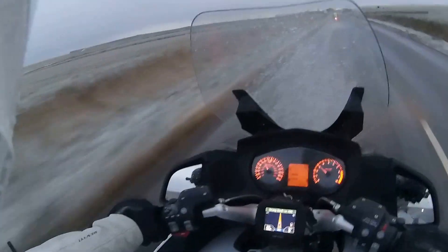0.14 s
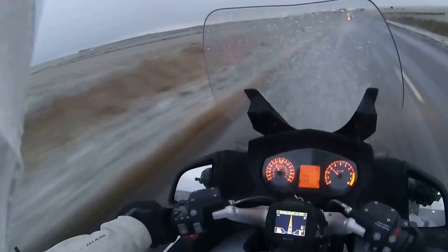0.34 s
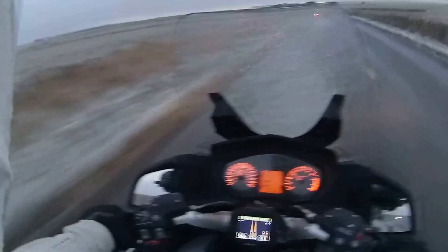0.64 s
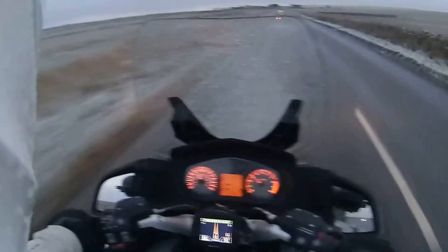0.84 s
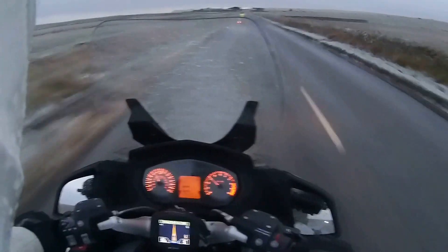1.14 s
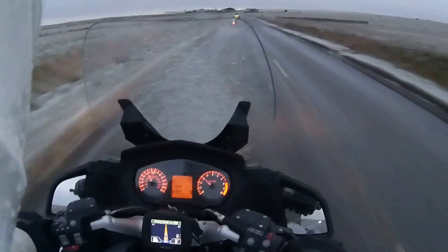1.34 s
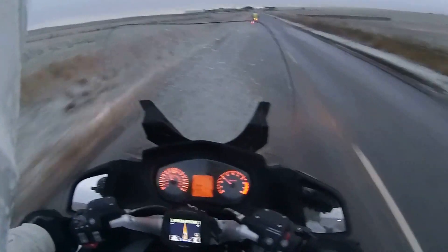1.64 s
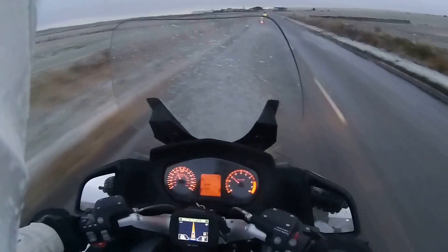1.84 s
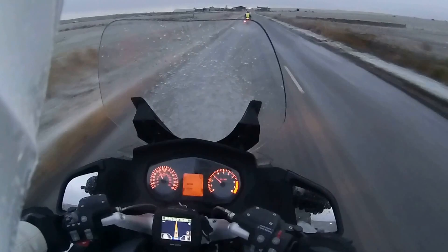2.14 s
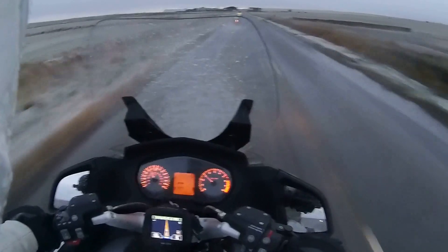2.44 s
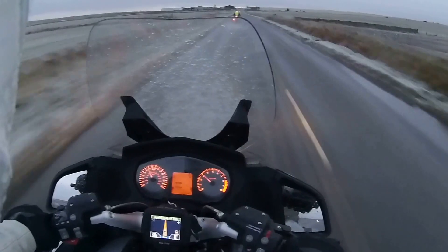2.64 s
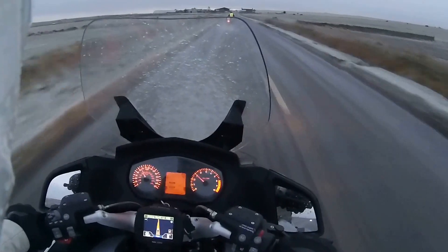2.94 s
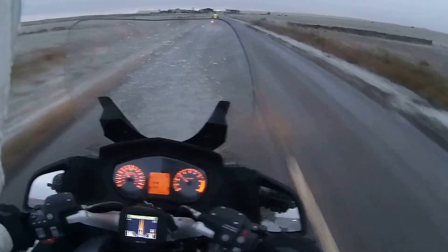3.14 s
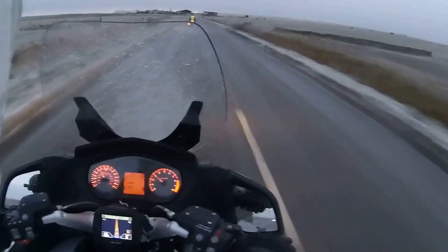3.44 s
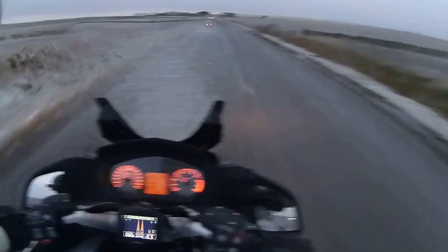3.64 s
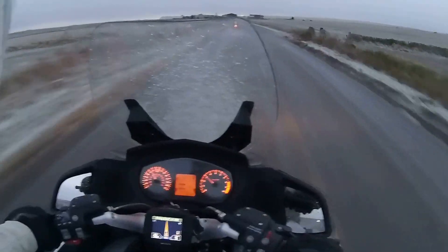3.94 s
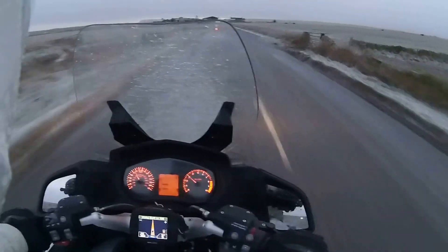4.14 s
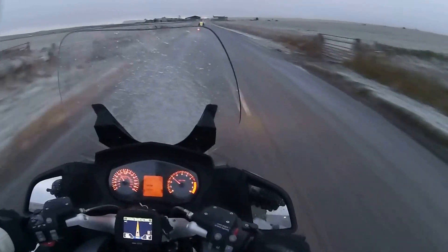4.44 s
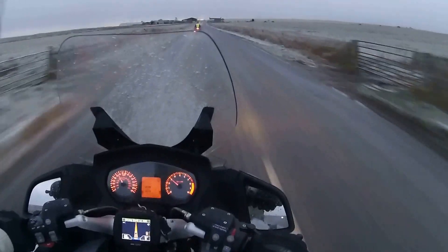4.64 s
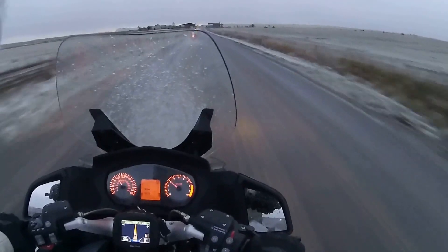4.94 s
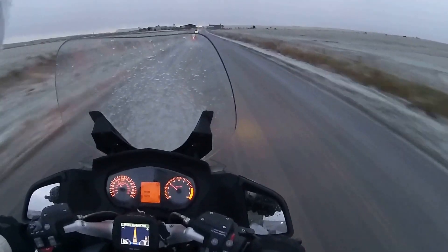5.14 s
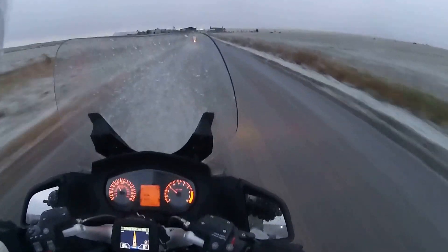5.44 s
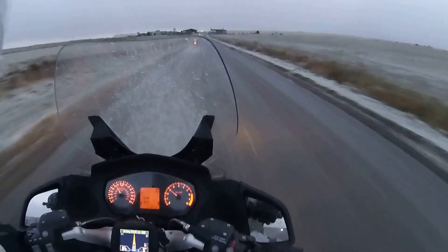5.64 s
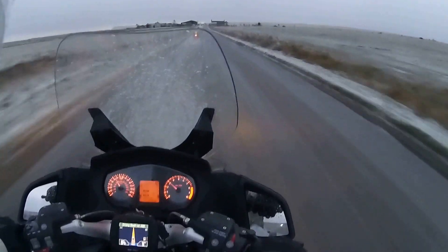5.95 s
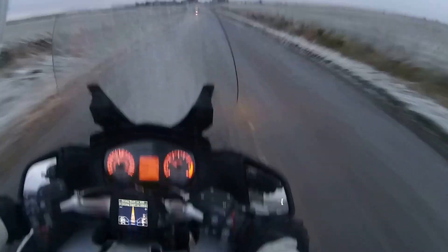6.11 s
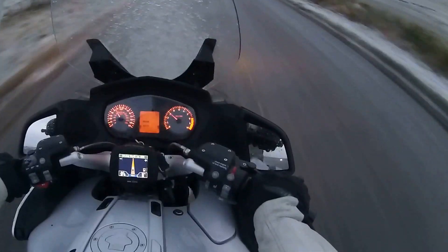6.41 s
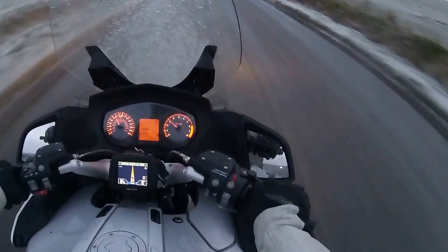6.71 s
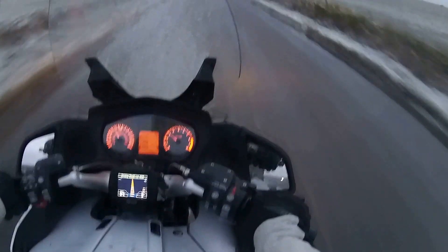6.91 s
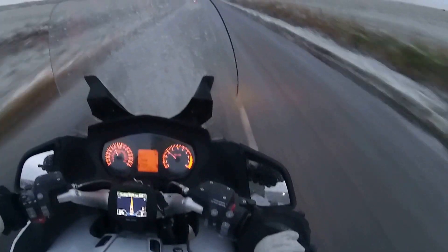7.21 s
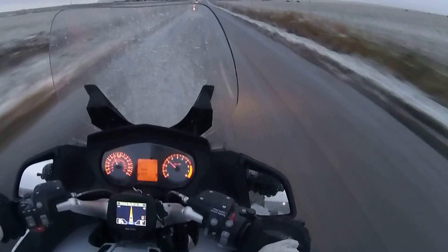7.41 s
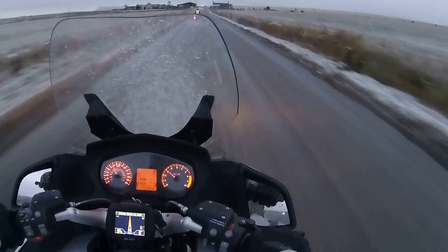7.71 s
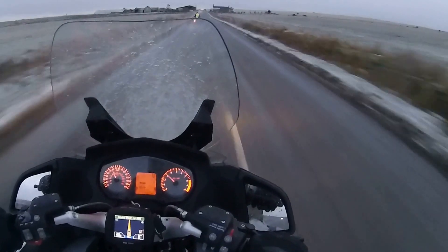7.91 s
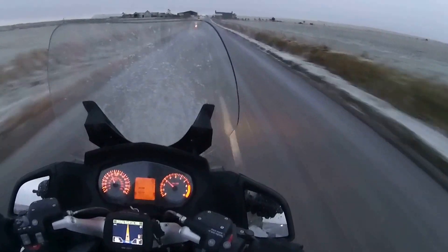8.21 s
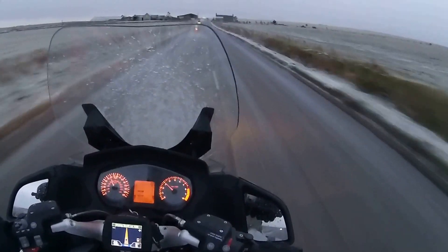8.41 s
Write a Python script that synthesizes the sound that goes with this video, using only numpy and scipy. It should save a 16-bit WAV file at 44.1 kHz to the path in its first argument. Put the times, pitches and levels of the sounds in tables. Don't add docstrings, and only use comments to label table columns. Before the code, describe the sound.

Close, boxed-in wind noise from a helmet-mounted microphone on a speeding motorcycle: rapid irregular buffeting, bassy slaps and brief gusty puffs, with automatic level dips after surges and gradual recovery. Air hisses faintly around the edges, fine spray and droplets tick on the casing, and the steady engine drone is nearly buried. A faint high-pitched circuit buzz runs at first, cuts out, then resumes until the end. Nearly mono, outdoors, without echo.

```python
import sys
import numpy as np
from scipy import signal
from scipy.fft import rfft, irfft, next_fast_len
from scipy.io import wavfile
from scipy.ndimage import uniform_filter1d

SR = 44100
rng = np.random.default_rng(int(sys.argv[2]) if len(sys.argv) > 2 else 0)


def unload_audio(sound):
    columns = np.transpose(np.atleast_2d(sound))
    steps = np.round(np.clip(columns, -1, 1) * 32767)
    wavfile.write(sys.argv[1], SR, steps.astype(np.int16))


def natural_amplitude(level_db):
    exponent = np.asarray(level_db, float) / 20
    return 10 ** exponent


N = 377937
CUTOFF_HZ = 15330

# centre_s, signed_height (relative; negative = suction)
SLAPS = [(0.36, 0.5), (0.517, -0.7), (0.767, 0.69), (0.842, 0.45), (1.394, 0.77), (1.458, 0.52),
         (1.623, -0.54), (1.654, -0.67), (1.902, 0.6), (2.367, 0.47), (2.772, 0.79), (2.822, 0.55),
         (3.038, -0.51), (3.417, 0.56), (3.441, 0.31), (3.572, -0.58), (5.506, 0.24), (5.572, 0.52),
         (5.666, 0.64), (5.837, 0.52), (6.14, -0.47), (6.337, -0.55), (6.502, -0.55), (6.761, 0.62),
         (6.996, -0.39), (7.023, -0.58), (7.048, -0.54), (7.086, 0.62), (7.255, -0.41), (7.378, -0.46)]
# centre_s, rise_db (negative = brief slackening)
PUFFS = [(0.095, 3), (0.513, 2.5), (0.758, 7), (1.16, 1.5), (1.365, 5.5), (1.467, 2.5), (1.634, 6),
         (1.838, 4.5), (1.905, 5), (2.267, 5.5), (2.353, 1.5), (2.7, -1), (2.781, 3.5), (2.948, 1),
         (3.087, 3.5), (3.558, 5), (3.914, 4.5), (4.082, 3), (4.152, 3.5), (4.458, 5.5), (4.887, 6),
         (5.001, 3.5), (5.49, 2), (5.88, 6.5), (6.143, 5), (6.475, 0.5), (6.752, 2.5), (7.328, 3),
         (7.854, 2.5), (8.499, 3.5)]
# step_s,
# level_after_db
DUCKS = [(0.0, -2.3), (0.504, -1), (0.562, -3.5), (0.913, -0.5), (1.079, -2.5), (1.512, -1.5),
         (1.706, -2.5), (2.01, -3.5), (2.31, -2.1), (2.415, -2.5), (2.863, -0.5), (3.102, -2.5),
         (3.357, 2.5), (3.477, 0.5), (3.588, 0), (3.861, 0.1), (4.11, -0.46), (4.471, -1.5), (4.639, -2),
         (4.784, -3), (5.193, -1.65), (5.703, -3), (5.887, -2.1), (6.47, 1.3), (6.735, 0.15), (7.075, -0.2),
         (7.408, -1.4), (7.759, -2), (8.013, -5), (8.357, -3)]


def wind():
    # frequency_hz, density_db (per Hz)
    buffet_colour = [(12, -41), (20, -9), (43, -3.5), (131, 0), (270, -7), (329, -5.5), (632, -22.5),
                     (745, -25), (822, -28.5), (1000, -32.5), (1300, -60), (2200, -120)]
    # frequency_hz, density_db (per Hz)
    rush_colour = [(900, -1), (1130, 0.5), (1320, -2), (1610, 0), (2440, -6.5), (3200, -5.5), (4100, -12),
                   (5080, -13), (6360, -19), (8100, -23), (8900, -21), (10500, -23.5), (12500, -30),
                   (15300, -37)]
    buffet_db, rush_db = -21, -39
    eddies, flutter = drift(10.7), drift(74.0)
    puffs_db = bumps(PUFFS, width_s=0.019)

    def buffet_eddies(hz):
        return (hz / 500) ** 0.38 * (1.3 * eddies + 1.33 * flutter + 0.47 * puffs_db)

    def rush_eddies(hz):
        return (hz / 4000) ** 0.14 * (0.39 * eddies + 1.18 * flutter + 0.87 * puffs_db)

    low = turbulence(buffet_colour, (170, 600), 15, 950, buffet_eddies, own_db=0.11, own_rate=10.6)
    high = turbulence(rush_colour, (900, 2300), 950, CUTOFF_HZ, rush_eddies, own_db=0.16, own_rate=42.0)
    return slapped(natural_amplitude(buffet_db) * low, hz=191) + natural_amplitude(rush_db) * high


def turbulence(spectrum, ref_hz, low_hz, high_hz, shared, own_db, own_rate):
    # time_s, level_db (about its mean)
    gusts = [(0.0, 2.5), (.35, 3), (.7, -.5), (1.2, 0.5), (1.85, 0.5), (2.2, 1.5), (2.8, 0.5), (3.2, -1),
             (3.7, -1), (4.2, -0.5), (4.65, -0.5), (5.3, -0.5), (5.9, 0.5), (6.5, -0.5), (7.0, 0), (7.4, 1),
             (8.0, 0), (8.57, 2.5)]
    # frequency_hz, share (of the gust swing)
    gust_share = [(90, 0.85), (320, 1.26), (1500, 0.94), (4800, 1.5)]
    # frequency_hz, spread_db
    lump_spread = [(90, 1.5), (320, 1.5), (1500, .8), (4800, 1.5), (10000, 1.1)]
    # centre_s, change_db, half_length_s
    roar_swells = [(0.6, 3.5, 0.036), (0.85, 6, 0.043), (1.22, -4.0, 0.04), (1.72, 1.5, 0.03),
                   (1.94, 2.5, 0.07), (2.36, -0.5, 0.07), (2.92, 3.5, 0.053), (3.19, 3.5, 0.033),
                   (3.35, -3.2, 0.05), (4.26, 3, 0.037), (4.33, 0, 0.034), (4.51, -1, 0.03), (4.95, -2, 0.035),
                   (5.23, -2.5, 0.07), (6.23, -4.5, 0.04), (6.44, -1, 0.11), (6.68, 0, 0.04), (6.94, 4, 0.04),
                   (7.05, -3, 0.04), (7.35, -5.0, 0.04), (7.51, -7, 0.036), (8.03, 4.5, 0.028),
                   (8.14, -3, 0.04), (8.27, 3, 0.04)]
    # centre_s, change_db, half_length_s
    stream_swells = [(0.1, -1.8, 0.051), (0.27, -1.5, 0.04), (1.22, -2, 0.04), (1.71, 2, 0.04),
                     (1.96, 1, 0.04), (2.12, 1, 0.03), (2.54, -2.5, 0.046), (3.13, -2, 0.042),
                     (3.56, 0, 0.038), (4.29, 1.1, 0.13), (4.65, 3.5, 0.095), (4.95, -2.5, 0.04),
                     (5.09, 2, 0.045), (5.69, 1, 0.05), (5.87, 0.2, 0.045), (6.18, -2.0, 0.032),
                     (6.41, -1.9, 0.052), (6.51, 2, 0.045), (7.03, -0.8, 0.04), (7.55, 1, 0.04),
                     (7.82, -2, 0.044), (8.12, -2.5, 0.04), (8.31, 2, 0.11), (8.45, -4, 0.033)]
    roll_top_hz, swell_low_hz = 350, 350
    gust_db = np.interp(np.arange(N) / SR, *np.transpose(gusts))
    roll_db, swell_db = bells(roar_swells), bells(stream_swells)
    out = np.zeros(N)
    for centre, band in octaves(spectrum, ref_hz, low_hz, high_hz):
        lumps_db = at_hz(lump_spread, centre) * drift(4.6)
        rolling_db = roll_db / (1 + (centre / roll_top_hz) ** 2)
        swelling_db = swell_db * (centre / 1500) ** 0.1 / (1 + (swell_low_hz / centre) ** 2)
        follow_db = at_hz(gust_share, centre) * gust_db
        flicker_db = own_db * drift(own_rate)
        level_db = follow_db + rolling_db + swelling_db + shared(centre) + lumps_db + flicker_db
        out += natural_amplitude(level_db) * band
    return out


def slapped(buffeting, hz):
    hold = np.clip(0.75 * bumps([(s, 1) for s, height in SLAPS], 0.42 / hz), 0, 1)
    pulse = 1.81 * bumps(SLAPS, 0.18 / hz) - 0.5 * bumps(SLAPS, 0.71 / hz)
    return buffeting * (1 - hold) + 0.83 * pulse


def octaves(spectrum, ref_hz, low_hz, high_hz):
    size = next_fast_len(N)
    hz = np.arange(1, size // 2 + 2) * SR / size
    colour = natural_amplitude(at_hz(spectrum, hz)) * (hz > low_hz) * (hz <= high_hz)
    inside = (hz > ref_hz[0]) & (hz < ref_hz[1])
    colour = colour / np.sqrt(2 / size * np.sum(colour[inside] ** 2))
    noise = colour * rfft(rng.standard_normal(size))
    for centre in 20 * 2. ** np.arange(11):
        if low_hz / 2 < centre < high_hz * 2:
            share = np.clip(1 - abs(np.log2(hz / centre)), 0, 1)
            yield centre, irfft(share * noise, size)[:N]


def drift(rate):
    r = np.exp(-40 * np.pi * rate / SR)
    slow = signal.lfilter([1], [1, -2 * r, r * r], rng.standard_normal(N // 20 + 2002))
    slow = slow[2000:]
    return np.interp(np.arange(N) / 20, np.arange(len(slow)), rms_one(slow))


def bumps(events, width_s):
    bell = np.exp(-(np.arange(-2000, 2001) / SR / width_s) ** 2)
    out = np.zeros(N + 4001)
    for s, value in events:
        at = round(s * SR)
        out[at:at + 4001] += value * bell
    return out[2000:2000 + N]


def bells(rows):
    t = np.arange(0, N + 64, 64) / SR
    change_db = sum(db * np.exp(-((t - s) / half_s) ** 2) for s, db, half_s in rows)
    return np.interp(np.arange(N) / SR, t, change_db)


def rms_one(x):
    return x / np.sqrt(np.mean(x ** 2) + 1e-20)


def at_hz(points, hz):
    point_hz, value = np.transpose(points)
    return np.interp(np.log(hz), np.log(point_hz), value)


def spray():
    # start_s, length_s, level_db
    spray_puffs = [
        (.08, .07, -53),
        (.3, .15, -62),
        (5.218, .06, -54),
        (5.35, 0.064, -57),
        (5.477, 0.074, -46),
        (5.63, 0.065, -68),
        (7.127, 0.15, -49.5),
        (7.29, .08, -50),
        (7.45, 0.08, -52),
        (7.57, .04, -60),
    ]
    # frequency_hz, density_db (per Hz)
    spray_colour = [(6000, -30), (8000, -16), (9000, -1), (10300, 1), (11200, -6), (13200, -8),
                    (15300, -13)]
    swell = np.zeros(N)
    for start, length, level_db in spray_puffs:
        at, span = round(start * SR), round(length * SR)
        swell[at:at + span] += natural_amplitude(level_db) * np.sin(np.linspace(0, np.pi, span)).clip(0) ** 0.52
    ticks_per_s = 14
    mist = (rng.random(N) < ticks_per_s / SR) * natural_amplitude(-65 + 2.8 * rng.exponential(1, N).clip(0, 3))
    mist = signal.lfilter([1], [1, -0.985], mist)
    hiss = sum(band for hz, band in octaves(spray_colour, (8900, 11800), 6000, CUTOFF_HZ))
    return (swell * natural_amplitude(1.7 * drift(120.)) + mist) * hiss


def engine():
    firing_hz, level_db = 98.2, -44
    phase = 2 * np.pi * np.cumsum(firing_hz * (1 + 0.005 * drift(0.48))) / SR
    return natural_amplitude(level_db) * np.sqrt(2) * np.sin(phase)


def droplets():
    # start_s, peak_db, ring_hz
    drops = [(.05, -37, 11800), (.457, -52, 13900), (.822, -50, 13000), (1.072, -48, 14000),
             (1.95, -48, 12000), (3.55, -48, 11000), (4.645, -48, 14000), (6.989, -42, 9300),
             (7.01, -48, 13500), (7.05, -50, 11500), (7.335, -39, 12500), (7.405, -48, 9500),
             (7.598, -46, 13500), (7.636, -39, 10000), (7.877, -46, 9000), (8.352, -48, 13500),
             (8.41, -34, 8500), (8.553, -36, 9000)]
    age = np.arange(int(0.012 * SR)) / SR
    out = np.zeros(N + len(age))
    noises = rng.standard_normal((len(drops), len(age)))
    for (s, peak_db, hz), noise in zip(drops, noises):
        at = round(s * SR)
        edges = [hz / 1.2, min(hz * 1.1, CUTOFF_HZ)]
        ring = signal.butter(1, edges, "band", fs=SR, output="sos")
        burst = rms_one(signal.sosfilt(ring, noise))
        out[at:at + len(age)] += natural_amplitude(peak_db) * burst * np.exp(-age / 0.002)
    return out[:N]


def buzz():
    # multiple, level_db (rms)
    harmonics = [(1, -52), (2, -70), (3, -53), (4, -50), (5, -54.5), (7, -57), (8, -56), (8.5, -75),
                 (9, -61.5), (9.5, -79), (11, -70), (12, -76), (15, -69), (16, -64), (17, -66), (17.5, -85),
                 (18.5, -84), (19, -66.5)]
    # start_s, end_s
    on_times = [
        (0, 1.35),
        (4.397, 9),
    ]
    switching_hz = 800
    t = np.arange(N) / SR
    on = sum((t >= start) * (t < end) for start, end in on_times)
    phases = rng.uniform(0, 2 * np.pi, len(harmonics))
    cycle_t = t[:SR // 100]
    cycle = sum(natural_amplitude(db) * np.sqrt(2) * np.cos(2 * np.pi * k * switching_hz * cycle_t + p)
                for (k, db), p in zip(harmonics, phases))
    return on * np.resize(cycle, N)


def gain_control():
    recovery_db_per_s = 10
    t = np.arange(N) / SR
    surge_s, after_db = np.transpose(DUCKS)
    last = np.clip(np.searchsorted(surge_s, t, side="right") - 1, 0, None)
    gain_db = after_db[last] + recovery_db_per_s * (t - surge_s[last])
    return natural_amplitude(uniform_filter1d(gain_db, size=11))


def channel_difference(level_db, bass_share, holes):
    # frequency_hz, density_db (per Hz)
    split_colour = [(18, -38), (30, -17), (140, -3.5), (298, -7), (489, -9), (2880, -19), (3640, -22),
                    (5530, -25), (7970, -25), (15300, -31)]
    half_s, lead_s, top_hz = 0.014, 0.006, 14600
    least_slap, least_puff_db = 0.53, 2.9
    times = [s for s, db in DUCKS[1:]]
    times += [s for s, db in PUFFS if db > least_puff_db]
    times += [s for s, height in SLAPS if abs(height) > least_slap]
    lows = rng.choice([400, 2300, 4300], len(times), p=[1 / 2, 1 / 3, 1 / 6])
    out = np.zeros(N)
    for centre, band in octaves(split_colour, (30, 600), 25, CUTOFF_HZ - 100):
        near = [(s - lead_s, 1) for s, low in zip(times, lows) if low / 1.3 < centre < top_hz * 1.5]
        gate = bumps(near, half_s) > np.exp(-1)
        gate &= drift(25.) > -holes
        gate |= drift(14.) > 2.0
        if centre < 2000:
            gate |= drift(5.0) > 0.9 * np.log2(centre / 300) - bass_share
        out += uniform_filter1d(gate * 1., size=300) * band
    return natural_amplitude(level_db) * out * [[1], [-1]]


def scene():
    hiss_db = -64
    preamp = buzz() + natural_amplitude(hiss_db) * rng.standard_normal(N)
    return np.tile(wind() + spray() + engine() + droplets() + preamp, (2, 1))


def band_limit(x):
    return signal.sosfilt(signal.butter(12, 15660, fs=SR, output="sos"), x)


def record(dry):
    x = 2.18 * np.tanh(dry * gain_control() / 2.22)
    x = x + channel_difference(level_db=-48.5, bass_share=0.1, holes=0.2)
    top_cut = signal.ellip(10, 0.5, 60, CUTOFF_HZ, fs=SR, output="sos")
    x = signal.sosfilt(top_cut, x)
    return band_limit(x)


dry = scene()
out = record(dry)
unload_audio(out)
```